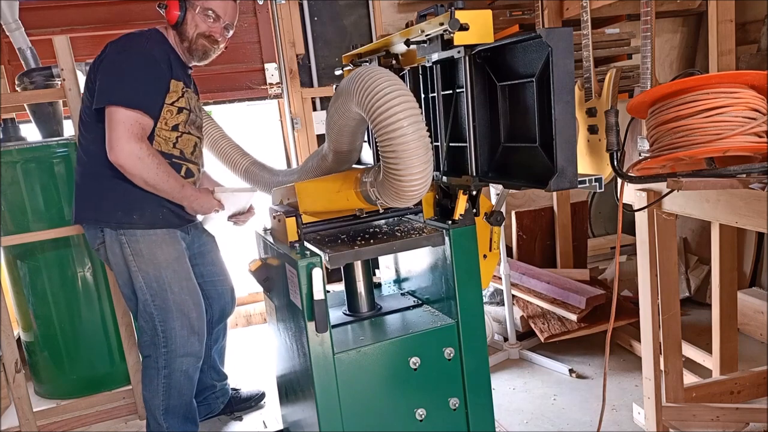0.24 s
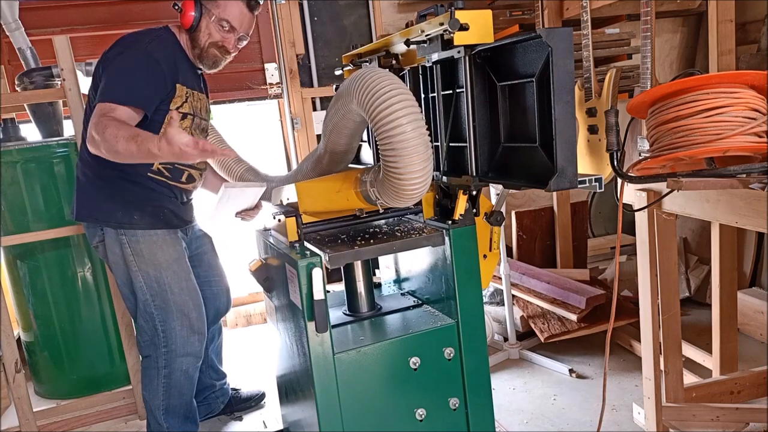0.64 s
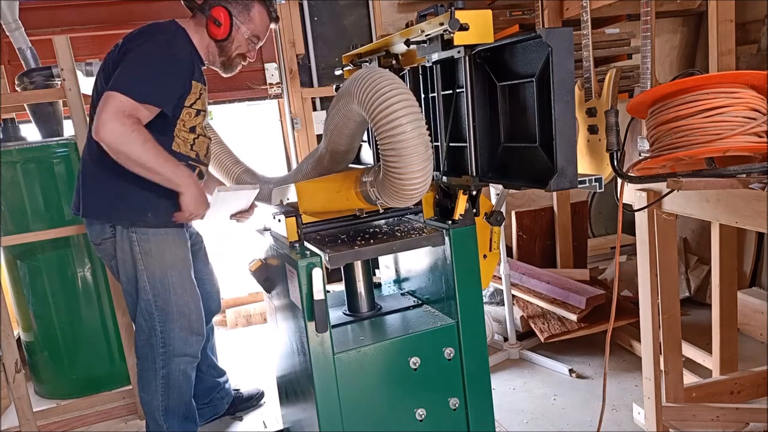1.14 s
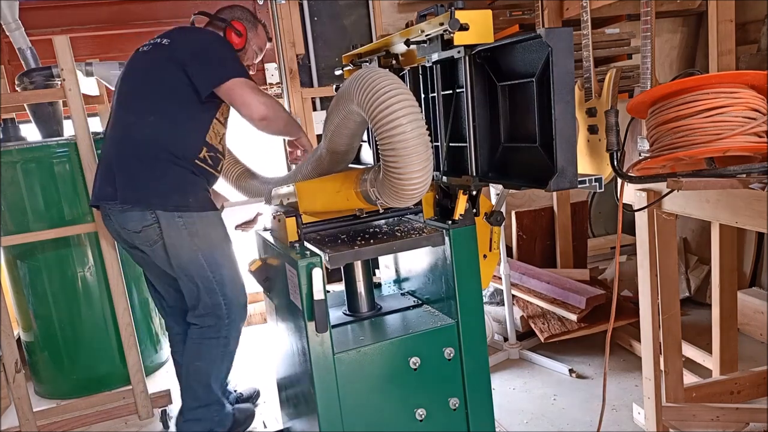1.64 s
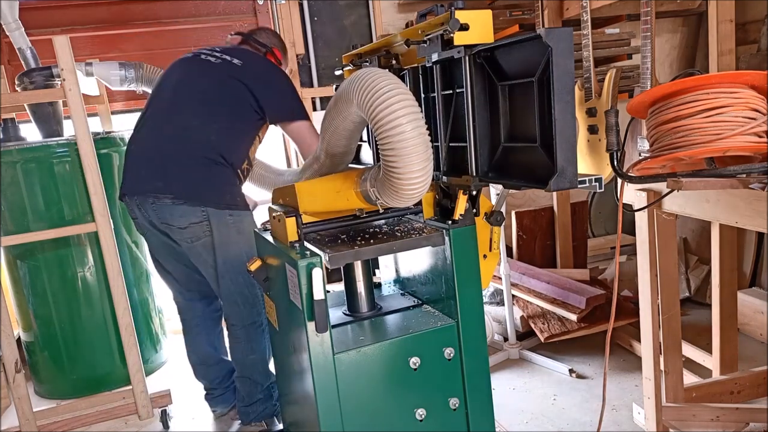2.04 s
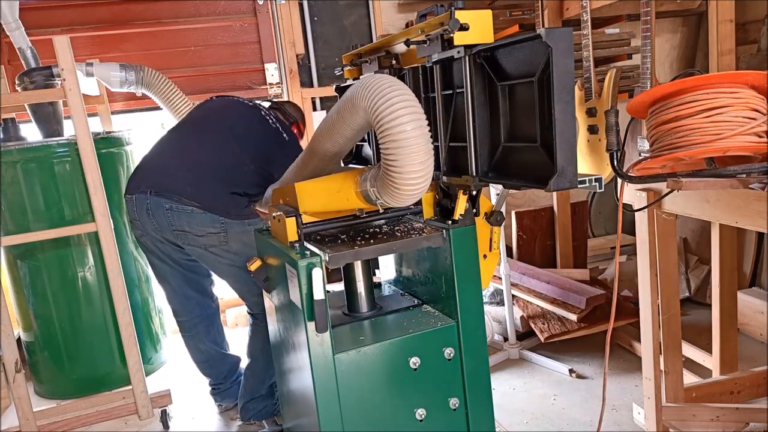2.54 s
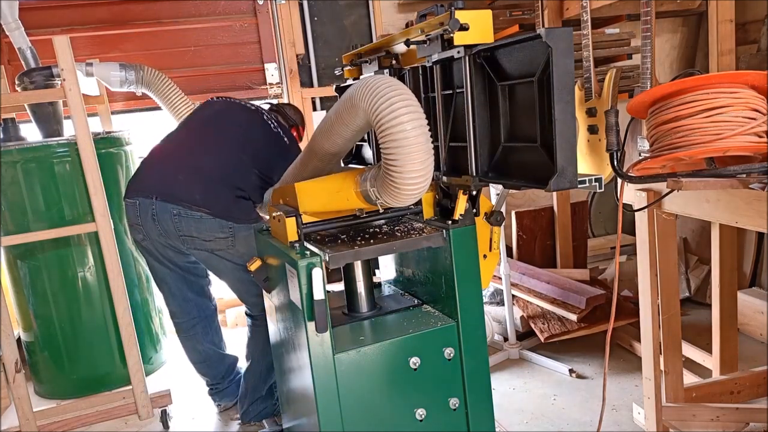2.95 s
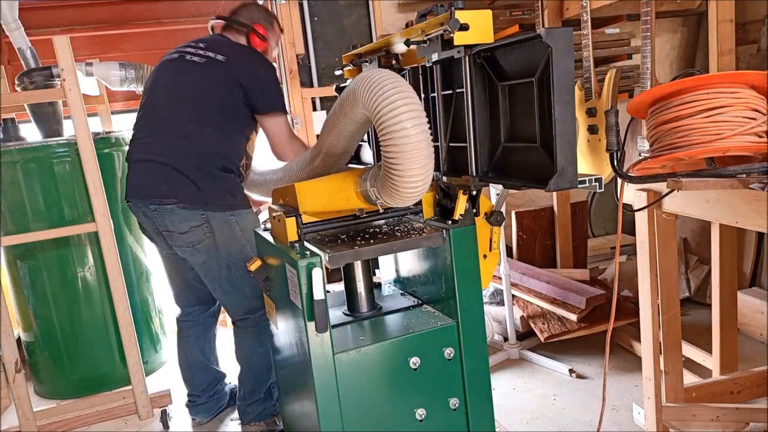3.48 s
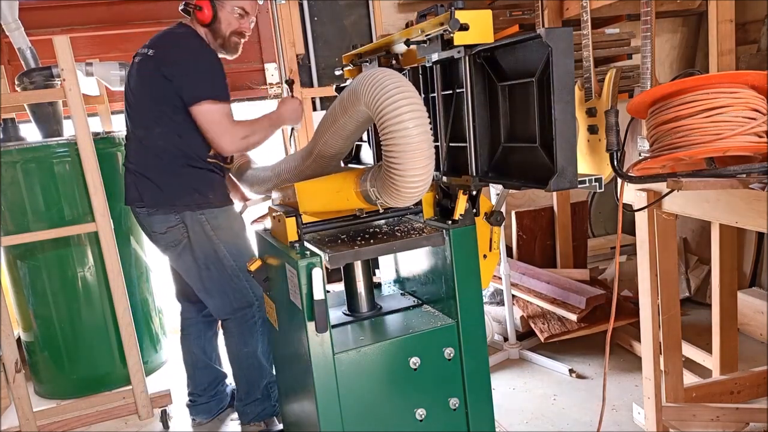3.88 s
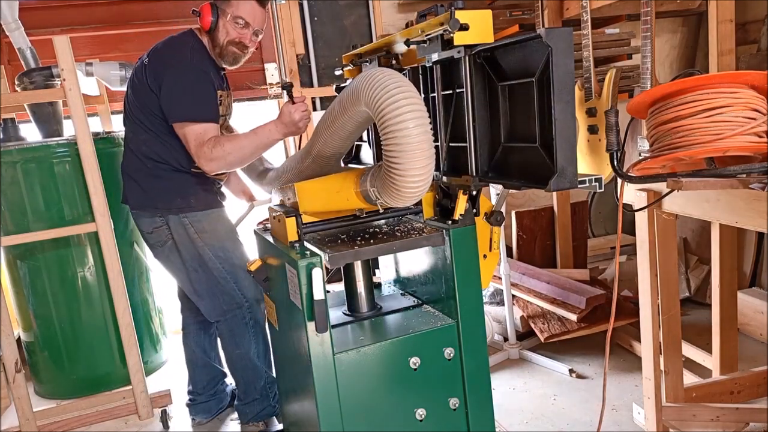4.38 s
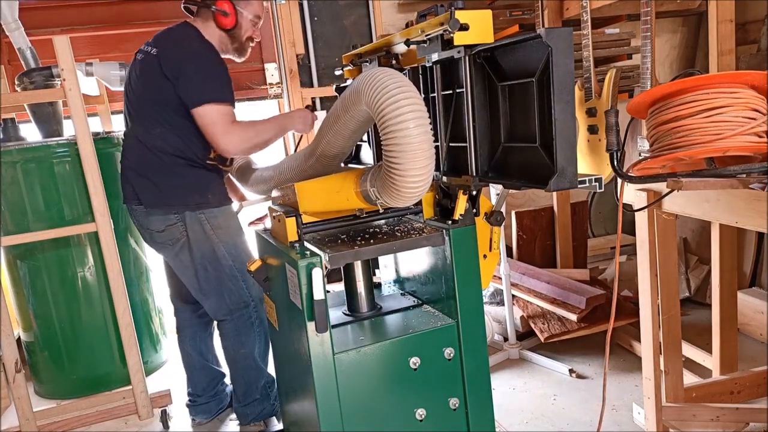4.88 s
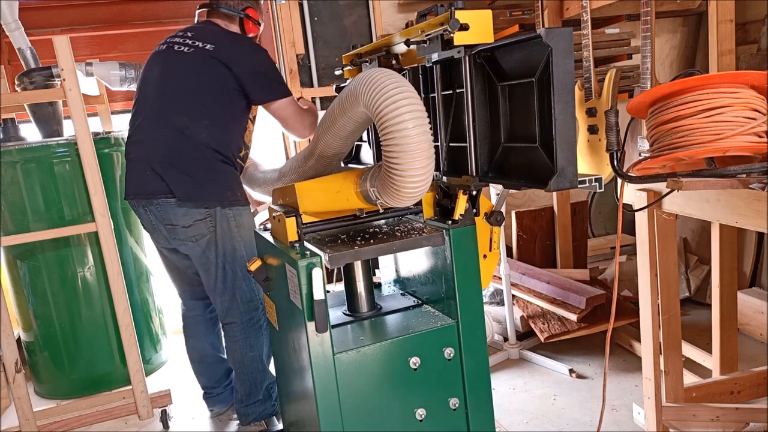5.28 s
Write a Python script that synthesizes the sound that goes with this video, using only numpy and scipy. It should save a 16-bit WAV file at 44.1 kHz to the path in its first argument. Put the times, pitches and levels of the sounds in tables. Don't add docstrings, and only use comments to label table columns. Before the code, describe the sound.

In a workshop, a planer runs continuously close to the microphone, singing one steady pitch near 520 hertz with a thin, high overtone. A ribbed extraction hose hums low in irregular swells beneath it, and suction air roars and hisses. The air dulls slightly as the operator leans in, then partly reopens. A little after three seconds the drive takes a load and its overtones shift, the whine hardly changing pitch. No clear impacts or talking.

```python
import sys
import numpy as np
from scipy import signal
from scipy.fft import rfft, irfft, next_fast_len
from scipy.io import wavfile
from scipy.ndimage import map_coordinates

SR = 44100
rng = np.random.default_rng(int(sys.argv[2]) if len(sys.argv) > 2 else 0)


def linear_from_db(decibels):
    return 10 ** (np.asarray(decibels, float) / 20)


def transcribe(u):
    v = np.clip(np.atleast_2d(u).T, -1, 1)
    q = np.round(v * 32767).astype(np.int16)
    wavfile.write(sys.argv[1], SR, q)


N = 243431

# time [s], roar_level [dB]
AIR_PATH = [(0, -39), (.25, -38.5), (.8, -38), (1.25, -38.5), (1.55, -39.3), (1.8, -40.5), (2.3, -41.5),
            (2.7, -40.5), (3.15, -39.5), (3.45, -40.5), (3.8, -40.5), (4.15, -40.5), (4.5, -39),
            (4.8, -39.5), (5.15, -40), (5.52, -40.5)]


def unit(x):
    return x / np.sqrt(np.mean(x ** 2) + 1e-20)


def curves(rows):
    s, *cols = np.transpose(rows)
    return [np.interp(np.arange(N) / SR, s, c) for c in cols]


def wobble(rate):
    knots = rng.standard_normal(int(N * rate / SR) + 4)
    return map_coordinates(knots, [np.arange(N) * rate / SR])


def ramp(start_s, length_s):
    return np.clip((np.arange(N) / SR - start_s) / length_s, 0, 1)


def turns(hz):
    return 2 * np.pi * np.cumsum(hz) / SR


def noise(response):
    m = next_fast_len(N + 8192)
    spectrum = rfft(rng.standard_normal(m)) * response(np.fft.rfftfreq(m, 1 / SR))
    return unit(irfft(spectrum, m)[:N])


def colour(points, hz):
    f, db = np.transpose(points)
    return linear_from_db(np.interp(np.log(hz + 1), np.log(f + 1), db, left=-120, right=-120))


def drive():
    # time [s], ninth_multiple [Hz], tone [dB]
    speed = [
        (0.05, 4704, -28.5),
        (1.53, 4704, -27.5),
        (1.77, 4705, -26.5),
        (4.11, 4702, -26.5),
        (4.52, 4703, -27.5),
        (5.47, 4703, -26),
    ]
    # level [dB rms], gain per dB of tone [dB], gain per dB of air path [dB],
    # gain under full load [dB], unsteadiness [dB]
    second = (-48, -2.1, -0.6, -1.2, 0.66)
    third = (-51.5, -0.5, 0.96, 1.8, 0.9)
    ninth = (-40, 0.04, .5, -6.5, 0.62)
    eighteenth = (-79, 1, 0.8, 3, 1.7)
    # multiple [times the drive tone], level [dB rms]
    weaker = [(4, -56.5), (5, -55), (6, -60), (7, -62), (8, -64), (10, -70.5), (11, -76.5), (12, -84.5),
              (15, -92), (19, -101), (20, -101), (22, -89.5), (23, -104)]

    ninth_hz, tone_db = curves(speed)
    phase = turns(ninth_hz / 9)
    path_db = curves(AIR_PATH)[0]
    near_db = tone_db - tone_db.mean()
    clear_db = path_db - path_db.mean()

    load_stays = 0.25
    taken = ramp(3.33, 0.13)
    load = taken - (1 - load_stays) * ramp(4.15, 0.16)

    def level(settings, load):
        db, per_near, per_clear, load_db, shake_db = settings
        steady_db = db + per_near * near_db + per_clear * clear_db + load_db * load
        return linear_from_db(steady_db + shake_db * (wobble(14) + 0.69 * wobble(5.4)))

    pull_phase = turns(np.full(N, 100))
    side = linear_from_db(-35) * np.sin(phase - pull_phase)
    out = linear_from_db(tone_db + 0.08 * wobble(12) + 0.11 * wobble(4)) * (np.sin(phase) + side)
    out += level(second, taken) * np.sin(2 * phase + 1)
    out += level(third, load) * np.sin(3 * phase + 2)
    pull = 1 + 0.07 * np.sin(pull_phase)
    out += level(ninth, load) * pull * np.sin(9 * phase + 0.1 * wobble(20))
    out += level(eighteenth, taken) * np.sin(18 * phase + 0.2 * wobble(20))
    for multiple, db in weaker:
        load_db = 2 * (multiple > 18) * (2 * taken - 1)
        tone = np.sin(multiple * phase + 0.45 * wobble(12) + rng.uniform(0, 7))
        out += linear_from_db(db + load_db + 1.2 * wobble(9.3)) * tone
    return np.sqrt(2) * out


def hose():
    # start [s], length [s], level [dB], pitch [Hz]
    swells = [(-.04, .22, -40, 216), (.3, .12, -33.5, 215), (0.432, 0.18, -34.5, 217),
              (0.596, .14, -37, 216.4), (.77, .14, -38, 217.8), (0.911, .22, -37, 216.5),
              (1.16, .04, -45, 219), (1.272, 0.12, -39.5, 213.2), (1.389, 0.21, -35.5, 216),
              (1.65, 0.13, -36.5, 218.6), (1.866, 0.16, -39, 219), (2.03, 0.18, -41, 217),
              (2.293, 0.19, -35.5, 216.5), (2.5, 0.098, -37, 210.3), (2.607, 0.12, -35.5, 213.4),
              (2.719, 0.17, -39.5, 211.4), (2.891, 0.097, -39, 215.2), (3.042, .16, -39.5, 216.4),
              (3.219, 0.049, -36, 224.3), (3.287, 0.086, -40, 214.2), (3.469, .16, -37, 215),
              (3.64, 0.061, -41, 217), (3.75, 0.097, -36, 217), (3.91, .05, -36, 213),
              (3.97, 0.25, -41.5, 214.8), (4.33, 0.057, -38, 220), (4.43, 0.11, -39, 220),
              (4.574, .55, -38, 218), (5.251, 0.068, -42, 223), (5.34, 0.14, -40, 219)]
    # pitch [Hz], width [Hz], level [dB rms]
    modes = [(104.6, 14, -57), (129, 21, -63.5), (167.2, 13, -49.5), (195.8, 11, -51), (218.3, 15, -50.5),
             (250.7, 26, -52), (284, 11, -50.5), (657, 11, -63.5), (768, 9.2, -66), (970, 42, -64),
             (1355, 28, -60), (1964, 32, -66.5), (2392, 12, -59), (2567, 17, -55.5), (2700, 25, -60.5),
             (6390, 86, -66), (6970, 46, -72.5)]

    strength = linear_from_db(-50.5) * np.ones(N)
    for start_s, length_s, db, _ in swells:
        rise_s, fall_s = min(0.04, length_s / 2), min(0.051, length_s / 2)
        fade = ramp(start_s + length_s - fall_s, fall_s)
        strength += linear_from_db(db) * (ramp(start_s, rise_s) - fade)

    start_s, length_s, _, hum_hz = np.transpose(swells)
    pitch_hz = np.interp(np.arange(N) / SR, start_s + length_s / 2, hum_hz)
    phase = turns(pitch_hz) + 0.4 * wobble(20)
    flutter = linear_from_db(-1 + 0.4 * wobble(21))
    out = np.sqrt(2) * strength * flutter * np.sin(phase)
    for hz, width, db in modes:
        def ring(f):
            damping = 1j * f * width
            return (damping / (hz * hz - f * f + damping)) ** 2
        out += linear_from_db(db) * noise(ring)
    return out


def walls(f):
    delays_s = rng.uniform(0.003, 0.04, 8)
    return 1 + 0.093 * sum(np.exp(-2j * np.pi * f * s) for s in delays_s)


def hose_echo(f):
    return 1 / (1 - 0.2 * np.exp(-2j * np.pi * f * 0.0162))


def air():
    # frequency [Hz], level [dB per Hz]
    rumble_bands = [(5, -9), (25, -16), (40, -8), (55, 5.5), (85, 0.5), (110, -26.5)]
    body_bands = [(60, -59.5), (90, -30), (150, -24), (320, -14.5), (420, -16.5), (520, -15.5),
                  (640, -19.5), (900, -23), (1150, -23.5), (1500, -25), (1750, -22), (2000, -58)]
    roar_bands = [(1500, -27.5), (1650, -11.5), (1750, -11), (1900, -2), (2250, -1.5), (2600, 1.5),
                  (2900, -1), (3000, -3), (4100, -9), (4450, -13), (4700, -7), (5200, -14), (5280, -21),
                  (5500, -46)]
    fill_bands = [(5150, -26), (5260, 0), (5500, -7.5), (5720, -7.5), (5800, -1), (6130, -2), (6300, -2.5),
                  (6400, -5.5), (6500, -29.5)]
    hiss_bands = [(6330, -38.5), (6390, -6), (6480, -0.5), (6600, 0.5), (6730, 2.5), (6780, -9.5),
                  (7080, -4.5), (7130, -8), (8000, -21), (9200, -28), (9800, -31.5), (12000, -38.5),
                  (13500, -33.5), (15730, -35)]
    # middle [s], half_length [s], level [dB]
    gusts = [
        (.62, .04, 2),
        (2.92, .05, 1.5),
        (3.125, .055, 5.5),
        (3.6, .12, -2),
        (5.19, .07, -3),
    ]

    roar_db, = curves(AIR_PATH)
    open_db = roar_db - roar_db.mean()
    t = np.arange(N) / SR
    gust_db = sum(db * np.exp(-((t - s) / half) ** 2) for s, half, db in gusts)
    leak_db = 9 * (1 - ramp(0.29, 0.12))

    rumble_db = -67.5 - 1.7 * open_db + 1.3 * wobble(4.4) + 1.1 * wobble(6.2)
    rumble = linear_from_db(rumble_db) * noise(lambda f: colour(rumble_bands, f))

    body_db = -45.5 + 0.8 * open_db + gust_db + 0.6 * wobble(13)
    body = linear_from_db(body_db) * noise(lambda f: colour(body_bands, f) * walls(f))

    roar_gain = linear_from_db(roar_db + 0.13 + 0.5 * wobble(18))
    roar = roar_gain * noise(lambda f: colour(roar_bands, f) * hose_echo(f) * walls(f))

    fill_db = -63.5 + 1.6 * open_db + leak_db + 0.55 * wobble(9.9)
    fill = linear_from_db(fill_db) * noise(lambda f: colour(fill_bands, f))

    hiss_db = -55 + 0.9 * open_db + 0.74 * wobble(20)
    hiss = linear_from_db(hiss_db) * noise(lambda f: colour(hiss_bands, f) * walls(f))
    return rumble + body + roar + fill + hiss


def scene():
    return (drive() + hose() + air())[None]


def round_coarsely(x):
    # frequency [Hz], step [dB]
    step_sizes = [(20, -74), (300, -63), (1200, -59), (2500, -55), (4200, -58), (5500, -65), (7600, -66),
                  (9400, -73), (22050, -75)]
    # middle [s], frames_in_a_row [count], extra_coarseness [dB]
    moments = [(.6514, 1, 0), (.7385, 1, 0), (1.2071, 1, 0), (1.3563, 1, -2), (2.0445, 1, -1),
               (2.3006, 1, 0), (2.4504, 1, -1), (2.85, 1, -1), (2.9313, 2, -1), (3.1492, 1, -3),
               (3.2527, 2, 0), (3.3466, 1, 1), (3.412, 1, 1), (3.498, 1, -1), (3.6662, 1, 0), (3.852, 1, 0),
               (4.025, 1, 1), (4.114, 1, 0), (4.9197, 1, 0), (5.2, 1, 0), (5.308, 1, 0), (5.4301, 1, -1)]

    frame = 1882
    half = frame // 2
    n, k = np.arange(frame) + 0.5, np.arange(half) + 0.5
    window = np.sqrt(2 / half) * np.sin(np.pi * n / frame)
    basis = window * np.cos(np.pi / half * np.outer(k, n + half / 2))
    usual_step = colour(step_sizes, k * SR / frame) * np.sqrt(frame)
    out = x.copy()
    for middle_s, count, coarse_db in moments:
        step = usual_step * linear_from_db(coarse_db)
        first = round(middle_s * SR - (count + 1) * half / 2)
        for start in first + half * np.arange(count):
            lines = basis @ x[start:start + frame] / step
            error = (np.round(lines) - lines) * step
            out[start:start + frame] += error @ basis
    return out


def low_pass(x):
    return signal.sosfilt(signal.butter(12, 15990, fs=SR, output="sos"), x)


def record(dry):
    mix = round_coarsely(dry[0])[None]
    return low_pass(mix)


dry = scene()
out = record(dry)
transcribe(out)
```